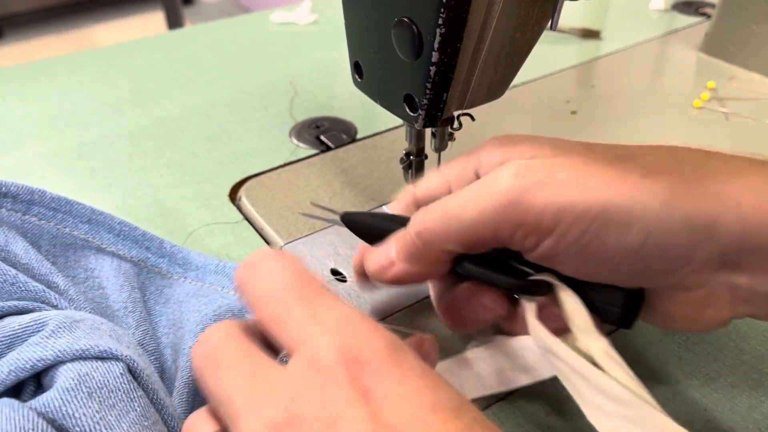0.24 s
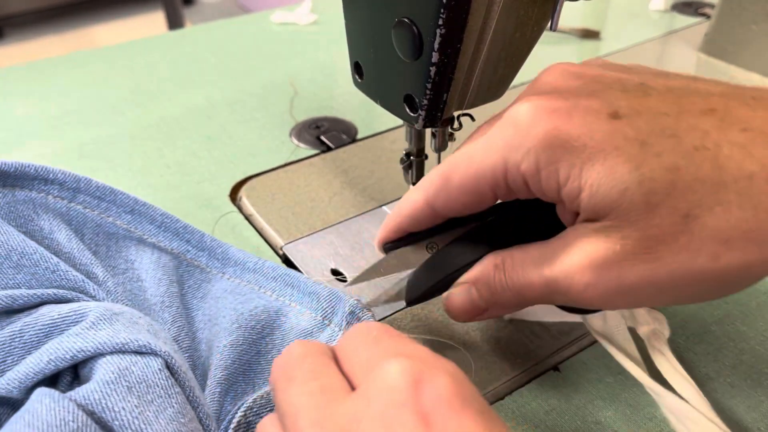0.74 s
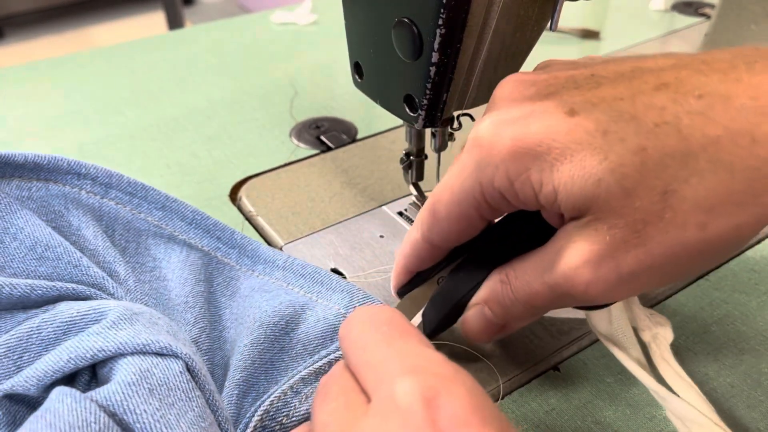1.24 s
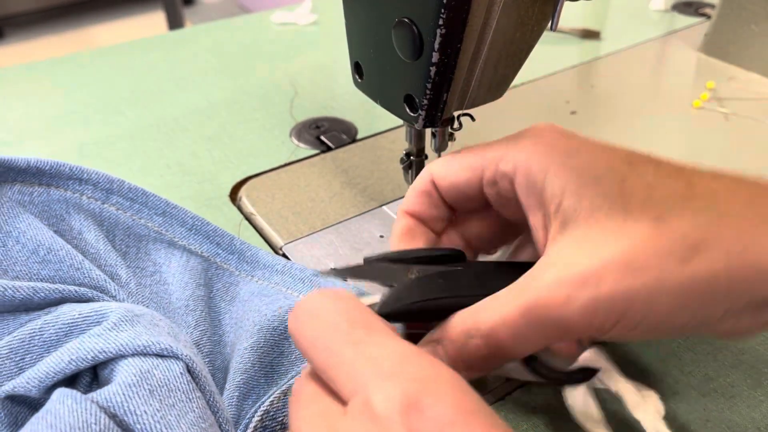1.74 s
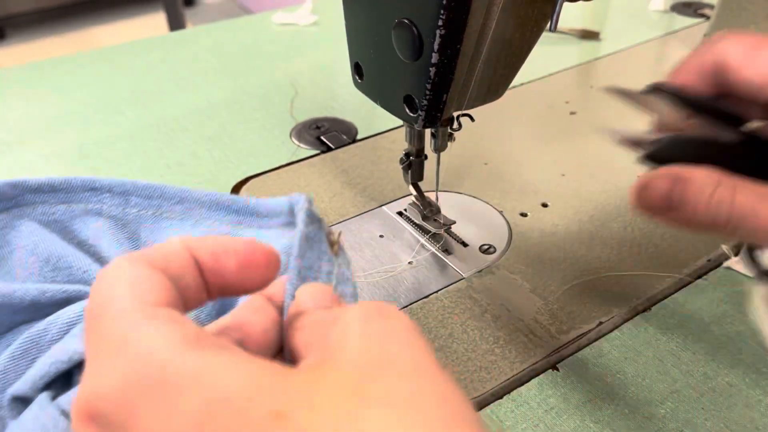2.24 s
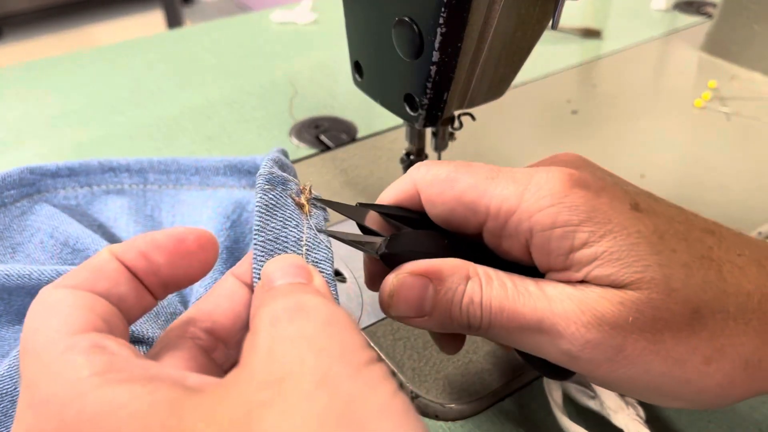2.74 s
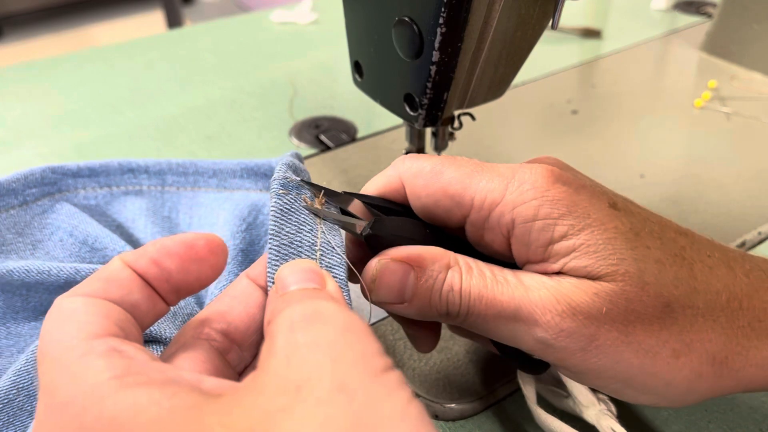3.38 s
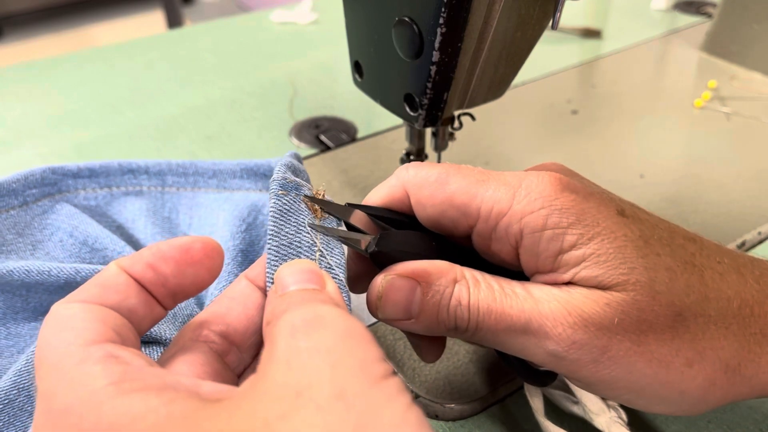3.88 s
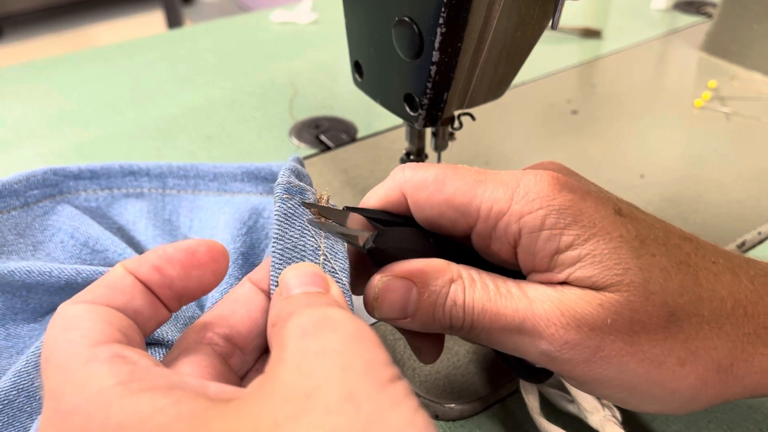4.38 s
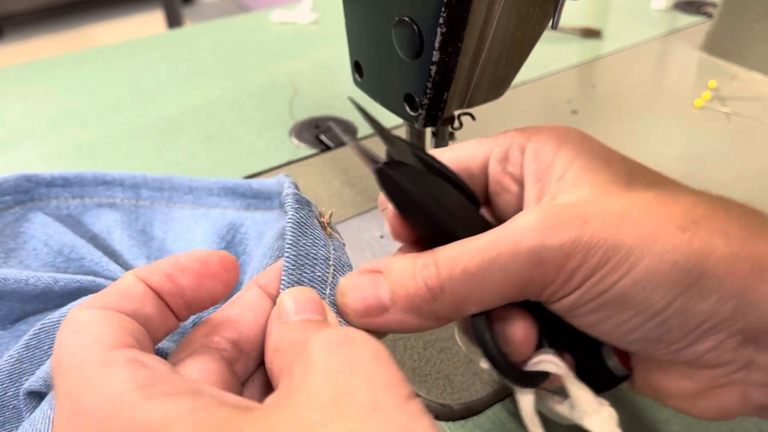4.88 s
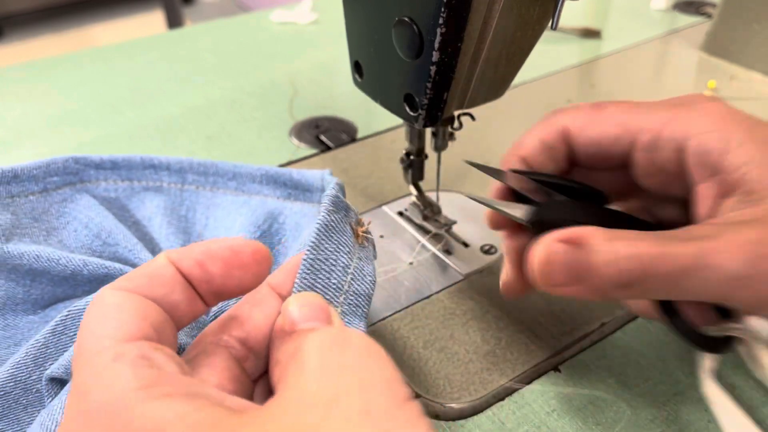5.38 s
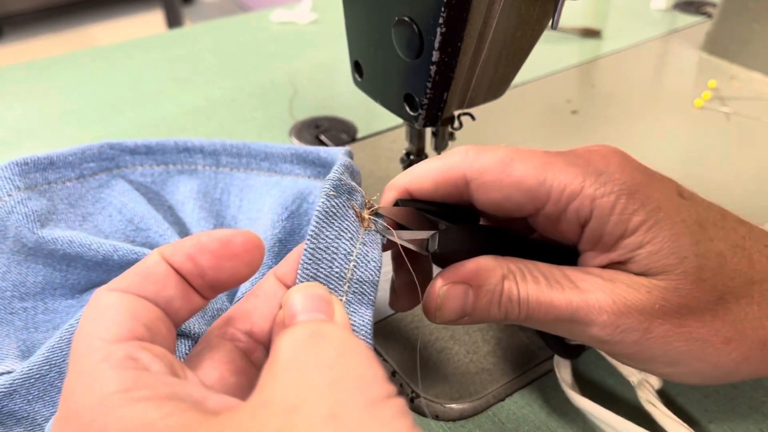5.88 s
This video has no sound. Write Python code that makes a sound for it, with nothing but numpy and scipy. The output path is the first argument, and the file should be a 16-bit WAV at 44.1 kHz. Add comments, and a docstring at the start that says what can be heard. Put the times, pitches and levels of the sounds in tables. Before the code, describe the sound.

Constant deep motor drone with soft airy hiss, broken by crisp metallic snip clicks early on and again later, heard close up.

```python
"""A steady motor hum runs throughout: an industrial sewing machine idles under the table, near a two-port phone.
Its shaft makes a stack of sine tones that beats against a slower motor nearby.
Cooling air is shaped noise, and noise through resonances is the shaken table and motor housing.
Thread snips scrape, squeal and knock near 1.4, 1.6, 4.4 and 4.6 s, with a faint tick near 3 s.
Each contact is a short burst that rings the snips' parts, heard in a small room."""
import sys
import numpy as np
from scipy import signal
from scipy.fft import rfft, irfft
from scipy.io import wavfile
from scipy.ndimage import uniform_filter1d

SR = 44100
rng = np.random.default_rng(int(sys.argv[2]) if len(sys.argv) > 2 else 0)


def inscribe(sig):
    """Save sig as 16-bit PCM at rate SR to the path in sys.argv[1].

    A 1-D sig is mono; a 2-D sig holds one channel per row.
    Samples are clipped to [-1, 1] before scaling.
    """
    pcm = np.round(np.clip(np.atleast_2d(sig).T, -1, 1) * 32767)
    wavfile.write(sys.argv[1], SR, pcm.astype(np.int16))


N = 269953  # length in samples, about 6.1 s

# Moving air, half the sum of the two ports: pitch_hz, level_db (per Hz)
AIR_SUM = [(20, -76), (40, -69), (80, -67.5), (200, -67.5), (450, -65.5), (700, -77.5), (850, -80.5),
           (1400, -81.5), (1800, -84), (2600, -88), (5000, -95), (6700, -103), (8500, -96.5), (11000, -104),
           (12000, -126), (15000, -112)]
# Moving air, half the difference between the ports: pitch_hz, level_db (per Hz)
AIR_SPREAD = [(20, -72), (120, -67.5), (300, -69.5), (500, -68.5), (850, -77.5), (1500, -82), (3000, -94),
              (5000, -94.5), (7400, -99), (8000, -117), (10000, -114), (10700, -102), (13500, -109),
              (15500, -124)]
# How alike sum and spread are: pitch_hz, likeness (-1 to 1, negative leans right)
AIR_LIKENESS = [(60, -0.25), (250, -0.38), (500, -0.72), (900, -0.24), (1200, -0.4), (2000, -0.4),
                (5000, -1), (6200, -0.66), (7500, 0.19), (16000, -0.13)]
RIPPLE_DB, RIPPLE_HZ = 3, 25  # standing waves dent the hiss: rms depth, spacing

# Table top and motor housing: pitch_hz, width_hz, level_db (rms), left_minus_right_db
TABLE_MODES = [(235.6, 1.6, -52, -5), (307, 21.6, -42, 0.5), (357.9, 17.5, -36, -0.5),
               (380.4, 65, -43.5, -20.5), (416.2, 8.8, -47.5, -13), (477, 76, -56, 25),
               (558, 23, -56.5, -15.5), (647, 140, -59, 12), (741, 58, -60, -13.5),
               (1059.5, 32, -62.5, -18), (1308, 81, -63.5, -4), (1438, 21, -62.5, 8), (1920, 110, -67, -6),
               (3875, 20, -72.5, -4), (5010, 110, -72, -2)]
TABLE_ALIKE = 0.98  # share of the shaking power that both ports hear

SHAFT_HZ, NEIGHBOUR_HZ, MAINS_HZ, DRONE_HZ = 59.915, 58.87, 60.015, 158.46
# Shaft tones: multiple (of shaft pitch), left_db, right_db, left_lead_rad
SHAFT_TONES = [(1, -24, -24, 0), (5, -48, -47, -.2), (6, -44, -38, -.4), (7, -57, -48, -1.5),
               (8, -62, -49, -2.3), (9, -74, -56, -1), (10, -51, -40, .6), (11, -60, -64, -.9),
               (14, -64, -64, 2.3), (18, -70, -62, -1.4), (20, -67, -70, 2.2), (23, -67, -64, .2)]
# The slower motor nearby: left_db, right_db
NEIGHBOUR_LEVELS = (-30, -27.5)
# Magnetic hum: multiple (of mains pitch), left_db, right_db
MAGNET_TONES = [(10, -57, -57), (11, -60, -63), (12, -54, -63)]
# Other steady whines: pitch_hz, left_db, right_db
WHINE_TONES = [(201.0, -56, -57), (218.4, -52, -51), (227.6, -56, -58), (261.0, -49, -48),
               (633.7, -57, -53), (682.9, -63, -64), (705.6, -64, -63), (1388, -63, -70), (142, -66, -65),
               (150, -62, -61), (166.3, -65, -64), (1593, -73, -70), (2035, -73, -70), (2482, -73, -69),
               (3165, -73, -69), (4134, -75, -70), (4533, -76, -71), (4802, -78, -73)]
# Wavering tones, each with a twin just above: pitch_hz, twin_higher_hz, quietest_s
BEATING_TONES = [(2 * SHAFT_HZ, .16, 3.56), (DRONE_HZ, .16, 1.19), (3 * SHAFT_HZ, .16, 3.56),
                 (4 * SHAFT_HZ, .37, 2.4)]
# Levels of those pairs, in the same order: tone_db, twin_db, left_minus_right_db
BEATING_LEVELS = [(-35, -39, 1.5), (-36.5, -47, -3), (-33, -36.5, -2), (-52, -45, -1.5)]
WOBBLE, WOBBLE_HZ = 0.042, 7.3  # the tones shiver in level: rms share, rough rate

# Ringing parts of the snips, levels relative within each part: pitch_hz, width_hz, level_db
BLADE_MODES = [(4860, 760, 0)]
HANDLE_MODES = [(2720, 490, 11.5), (3210, 970, 14.5), (3830, 1300, 8), (1910, 600, -12)]
EDGE_MODES = [(6380, 1500, 13.5), (8550, 3900, 3), (9940, 760, -3.5), (11300, 1100, 9.2), (14800, 1800, 1),
              (12600, 1600, 4)]
# Blades slide, swelling up to a catch or a stop: peak_s, rise_ms, blades_db, handles_db, edge_db
BLADE_SLIDES = [(1.374, 6.8, -44, -40, -35.5), (1.593, 8, -37, -41, -31), (1.605, 7.5, -30, -40, -27),
                (4.429, 11, -61, -47, -36), (4.627, 10, -37, -40, -29.5), (4.636, 5.5, -30, -23, -26)]
# Blades catch and squeal: peak_s, level_db (blades), fall_ms, rest_db (handles and edge, relative to blades)
BLADE_CATCHES = [(1.5953, -13.5, .8, -24), (4.3768, -40, 2., -6), (4.6274, -14, .5, -17)]
# Blades and handles knock: peak_s, fall_ms, blades_db, handles_db, edge_db,
# handle_pitch_ratio (a looser grip is lower)
KNOCKS = [(1.3702, .6, -38, -42, -38, 1.1), (1.3754, 0.92, -30, -27, -24, 0.94),
          (1.5932, .4, -35, -40, -34, 1.2), (1.6005, 0.51, -40, -30, -32, 0.89),
          (1.603, 0.42, -31, -24, -34, 0.88), (1.6054, .9, -21.5, -42, -25, 0.91),
          (1.6061, 1.1, -36, -22, -15, 0.896), (2.98, 0.6, -70, -60, -35, 1.),
          (4.382, 1.6, -55, -39, -55, 1.3), (4.4274, 0.23, -40, -25, -20, 0.74),
          (4.4318, .5, -55, -45, -38, 0.9), (4.633, 1.1, -29, -20, -36, 1.12),
          (4.637, .7, -32, -20, -15, 1.03), (4.6387, 0.77, -30, -26, -21, 0.96)]
SLIDE_FALL_MS = 1.5
CATCH_RISE_SHARE, STOP_RISE_SHARE = .8, 0.37  # rise time as a share of fall time
SQUEAL_HZ, SQUEAL_WANDER_HZ = 4920, 110  # centre pitch and its rms drift
SQUEAL_ROUGH = .5  # amount of noise mixed into the squeal
GRIT_DB = 2  # the rub is patchy from one millisecond to the next: rms depth

# How the ports differ in loudness for the snips: pitch_hz, left_minus_right_db
PORT_LEVELS = [(1400, -5), (2400, -8.5), (4400, -7.5), (8100, 1), (16000, 0)]
# How they differ in timing for the snips: pitch_hz, right_lead_rad
PORT_PHASES = [(1800, -.7), (3200, 1.2), (4900, .4), (5700, -2.6), (7000, -3.3), (7750, -6.1), (9650, -6.4),
               (10500, -8.1), (13700, -9.8), (16000, -12.4)]
ROOM_T60_S = 0.15  # time for the tail to fall by 60 dB
ROOM_DB, ROOM_DULL_HZ = -11.5, 6000  # tail level before dulling, then its treble cut
ROOM_APART = .4  # strength of each port's own tail beside the shared tail at 1
TOP_HZ = 15720  # the phone cuts everything above this


def undb(db):
    """Turn decibels into a gain."""
    return 10 ** (np.asarray(db) / 20)


def pan(x, db):
    """Make left and right copies, db apart."""
    return x * undb(np.array([[db / 2], [-db / 2]]))


def on_bins(points):
    """Join (Hz, value) points by straight lines on a log axis and read them at every frequency bin."""
    hz, value = np.transpose(points)
    bins_hz = np.fft.rfftfreq(N, 1 / SR)
    return np.interp(np.log(bins_hz + 1), np.log(hz), value)  # +1 avoids the log of zero


def ring(x, hz, width_hz):
    """One resonance lets its own pitch through, with gain 1 at the centre."""
    b, a = signal.iirpeak(hz, hz / width_hz, SR)
    return signal.lfilter(b, a, x)


def steep(x, hz, width_hz):
    """Three resonances in a row leave little sound away from the centre."""
    x = ring(x, hz, 2 * width_hz)
    x = ring(x, hz, 2 * width_hz)
    return ring(x, hz, width_hz)


def unit(x):
    """Scale to an rms of 1."""
    return x / np.sqrt(np.mean(x ** 2))


def tone(hz, phase):
    """A steady sine of rms 1."""
    return np.sqrt(2) * np.cos(2 * np.pi * hz * np.arange(N) / SR + phase)


def air():
    """Moving air hisses smoothly; the spread partly follows the sum, so the hiss leans to one side."""
    common, extra = rfft(rng.standard_normal((2, N))) * np.sqrt(SR / 2)  # power of 1 per Hz
    likeness = np.clip(on_bins(AIR_LIKENESS), -1, 1)
    mid = common * undb(on_bins(AIR_SUM))
    side = likeness * common + np.sqrt(1 - likeness ** 2) * extra
    side = side * undb(on_bins(AIR_SPREAD))
    # smoothed noise along the frequency axis makes the dents
    step = int(RIPPLE_HZ * N / SR)
    dents = rng.standard_normal((2, len(common)))
    dents = uniform_filter1d(uniform_filter1d(dents, step), step)
    mid, side = irfft(np.array([mid, side]) * undb(RIPPLE_DB * unit(dents)), N)
    return np.array([mid + side, mid - side])


def table():
    """Air and bearings shake each resonance at random, so it swells and fades, mostly alike at both ports."""
    hz = np.fft.rfftfreq(N, 1 / SR)
    shakes = rfft(rng.standard_normal((3, N)))
    shake = np.sqrt(TABLE_ALIKE) * shakes[0] + np.sqrt(1 - TABLE_ALIKE) * shakes[1:]
    power = 0
    for mode_hz, width_hz, db, pan_db in TABLE_MODES:
        peak = 1 / (1 + (2 * (hz - mode_hz) / width_hz) ** 2)
        power = power + pan(unit(peak) * undb(db), pan_db) ** 2
    return irfft(shake * np.sqrt(power), N)


def motor_shiver():
    """A slow random gain around 1, made from smoothed noise."""
    step = int(SR / WOBBLE_HZ / 2)
    smooth = uniform_filter1d(rng.standard_normal(N), step)
    smooth = uniform_filter1d(smooth, step // 3)
    return 1 + WOBBLE * unit(smooth)


def hum():
    """Motors, mains and whines are sines; close pitches drift in and out of step, so they beat."""
    rows = [(k * SHAFT_HZ, left_db, right_db, lead) for k, left_db, right_db, lead in SHAFT_TONES]
    rows += [(k * MAINS_HZ, left_db, right_db, 0) for k, left_db, right_db in MAGNET_TONES]
    rows += [(*whine, 0) for whine in WHINE_TONES]
    shiver = motor_shiver()
    phases = 2 * np.pi * rng.random(len(rows))
    phases[0] = 0  # the lowest shaft tones peak together once a turn
    # shaft and neighbour start in step and beat about once a second
    out = tone(NEIGHBOUR_HZ, phases[0]) * undb(NEIGHBOUR_LEVELS)[:, None]
    for (hz, left_db, right_db, lead), phase in zip(rows, phases):
        left = undb(left_db) * tone(hz, phase + lead)
        right = undb(right_db) * tone(hz, phase)
        out += [left, right]
    for (hz, beat_hz, quiet_s), (db, twin_db, pan_db) in zip(BEATING_TONES, BEATING_LEVELS):
        # the twin opposes its tone at the quiet moment
        twin = tone(hz + beat_hz, np.pi - 2 * np.pi * beat_hz * quiet_s)
        pair = undb(db) * tone(hz, 0) + undb(twin_db) * twin
        # the drone comes from elsewhere, so dividing here cancels the shiver below
        steady = shiver if hz == DRONE_HZ else 1
        out += pan(pair, pan_db) / steady
    return out * shiver


def contacts():
    """List every touch: peak_s, rise_ms, fall_ms, blades_db, handles_db, edge_db, handle_pitch_ratio."""
    rows = []
    for s, rise_ms, *parts_db in BLADE_SLIDES:
        rows.append((s, rise_ms, SLIDE_FALL_MS, *parts_db, 1))
    for s, db, fall_ms, rest_db in BLADE_CATCHES:
        rows.append((s, CATCH_RISE_SHARE * fall_ms, fall_ms, db, db + rest_db, db + rest_db, 1))
    for s, fall_ms, *rest in KNOCKS:
        rows.append((s, STOP_RISE_SHARE * fall_ms, fall_ms, *rest))
    return rows


def snips():
    """Each touch swells and dies; friction locks the blades into a squeal and rattles handles and edge."""
    out = np.zeros(N)
    t_ms = np.arange(-2048, 2048) / SR * 1000  # 0 at the peak
    for s, rise_ms, fall_ms, *parts_db, grip in contacts():
        rise = np.exp(-(t_ms / rise_ms) ** 2)
        fall = np.exp(-np.abs(t_ms) / fall_ms)
        press = np.where(t_ms < 0, rise, fall)
        drift, patches, *rubs = rng.standard_normal((13, len(t_ms)))
        rubs = rubs * undb(GRIT_DB * unit(uniform_filter1d(patches, size=40)))
        slip_hz = SQUEAL_HZ + SQUEAL_WANDER_HZ * unit(uniform_filter1d(drift, size=128))
        squeal = np.cos(2 * np.pi * np.cumsum(slip_hz) / SR) + SQUEAL_ROUGH * rubs[0]
        pushes = [squeal], rubs[1:5], rubs[5:]  # each resonance is rubbed in its own way
        parts = BLADE_MODES, HANDLE_MODES, EDGE_MODES
        at = int(s * SR) - len(t_ms) // 2
        for modes, push, pitch, db in zip(parts, pushes, (1, grip, 1), parts_db):
            part = 0
            for rub, (hz, width_hz, mode_db) in zip(push, modes):
                part = part + undb(mode_db) * steep(press * rub, pitch * hz, width_hz)
            # the blow's energy follows its strength and length, whatever the grain of the rub
            even = np.sqrt(np.sum(press ** 2) / np.sum(part ** 2))
            out[at:at + len(t_ms)] += undb(db) * part * even
    return out


def room(x):
    """Each port hears the direct sound its own way, then a short, dull, scattered tail."""
    # half of the difference between the ports goes to each, in opposite directions
    half = undb(on_bins(PORT_LEVELS) / 2) * np.exp(-.5j * on_bins(PORT_PHASES))
    direct = irfft(rfft(x) * np.array([half, 1 / half]), N)
    t = np.arange(SR // 2) / SR
    shared, *own = rng.standard_normal((3, len(t)))
    fade = np.exp(-np.log(1000) * t / ROOM_T60_S) * (t > .004)  # the tail waits 4 ms
    tail = (shared + ROOM_APART * np.array(own)) * fade
    tail *= undb(ROOM_DB) / np.sqrt(np.sum(tail ** 2, axis=1, keepdims=True))
    b, a = signal.butter(1, ROOM_DULL_HZ, fs=SR)
    tail = signal.lfilter(b, a, tail)
    return direct + signal.fftconvolve(direct, tail, axes=1)[:, :N]


def scene():
    """Add motor hum, air and table shake to the snips in their room."""
    return hum() + air() + table() + room(snips())


def record(dry):
    """The phone cuts the very top of the treble with a steep low-pass filter."""
    top_cut = signal.ellip(10, .2, 80, TOP_HZ, fs=SR, output="sos")
    return signal.sosfilt(top_cut, dry)


dry = scene()
out = record(dry)
inscribe(out)
```